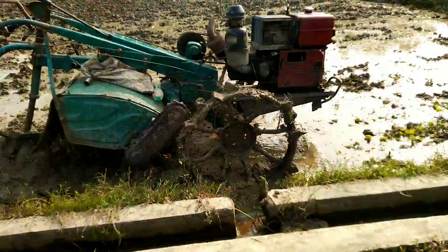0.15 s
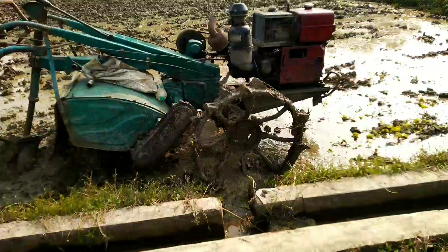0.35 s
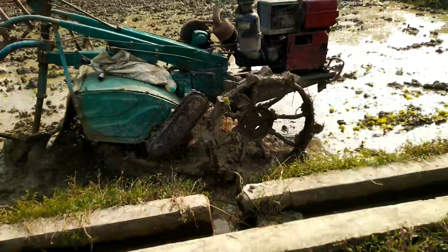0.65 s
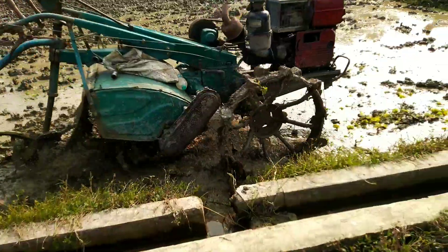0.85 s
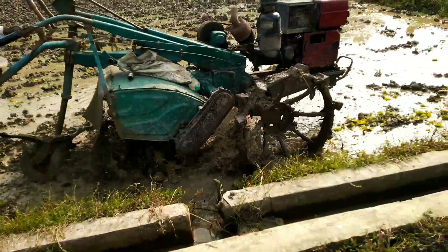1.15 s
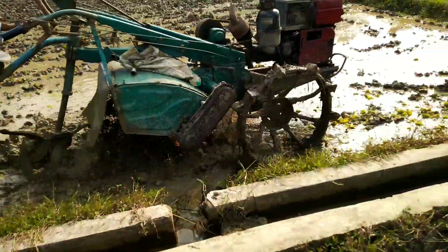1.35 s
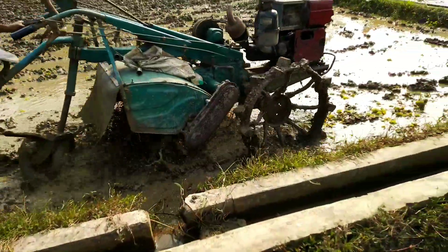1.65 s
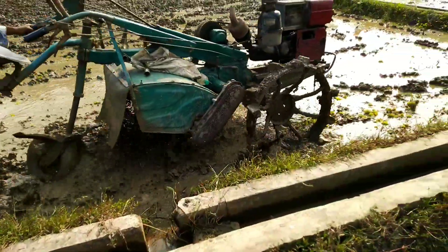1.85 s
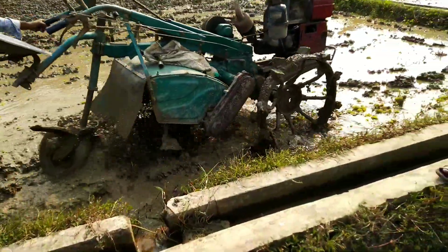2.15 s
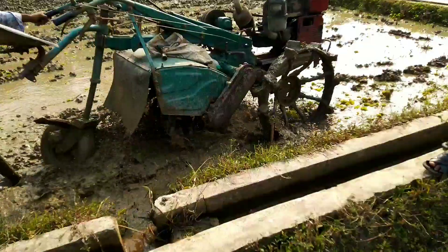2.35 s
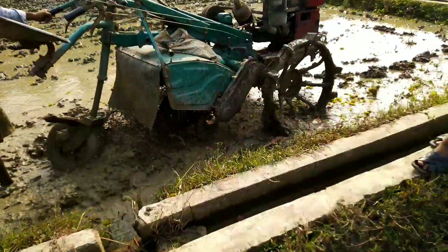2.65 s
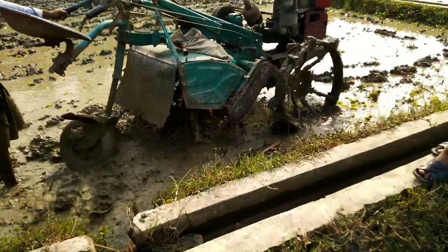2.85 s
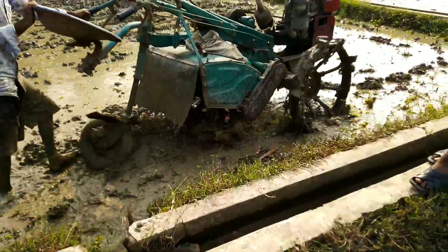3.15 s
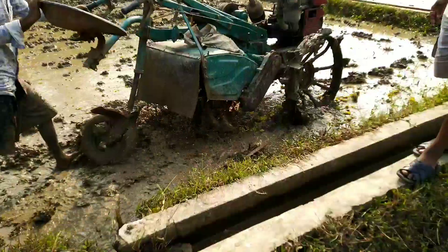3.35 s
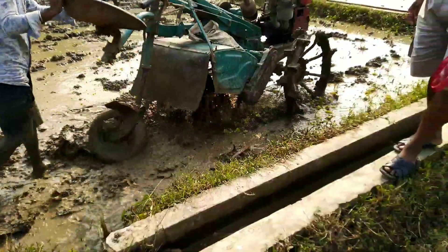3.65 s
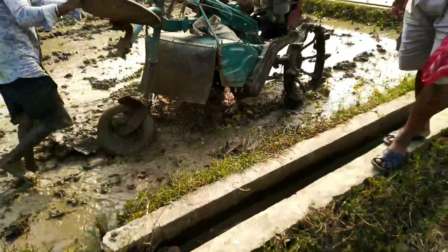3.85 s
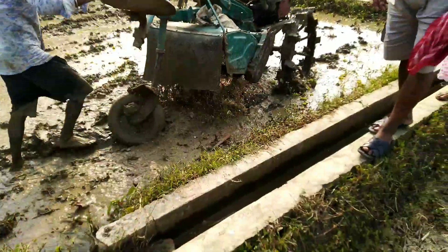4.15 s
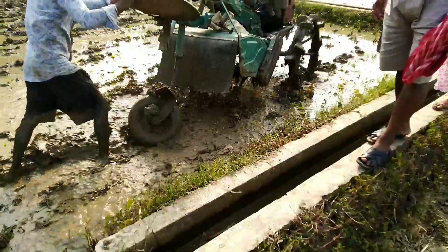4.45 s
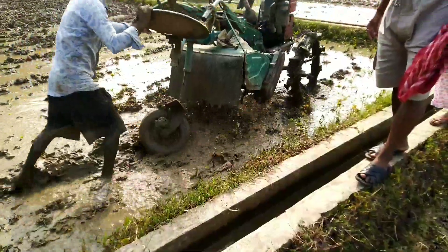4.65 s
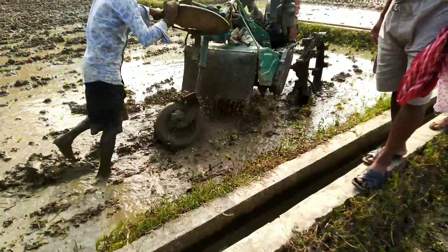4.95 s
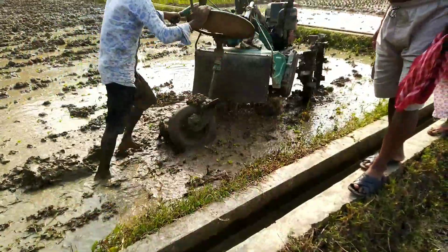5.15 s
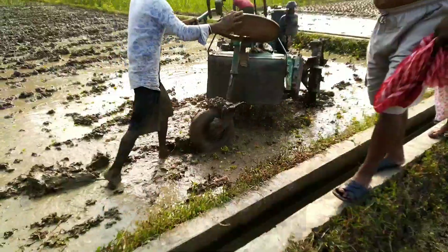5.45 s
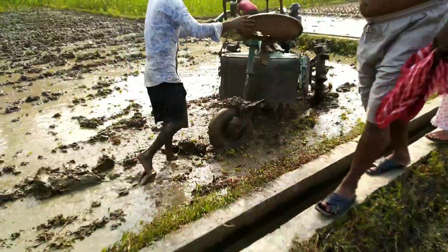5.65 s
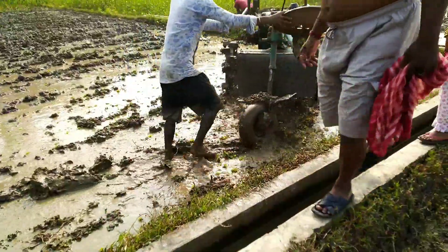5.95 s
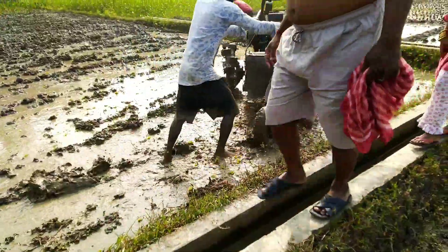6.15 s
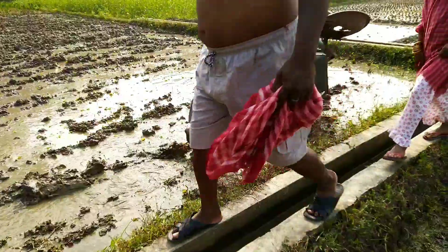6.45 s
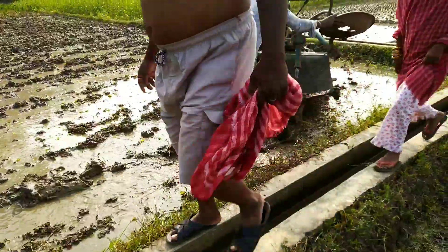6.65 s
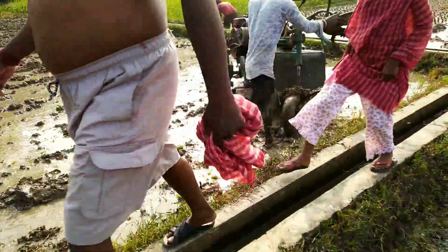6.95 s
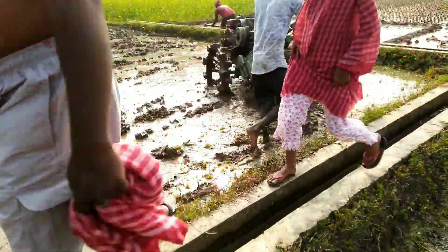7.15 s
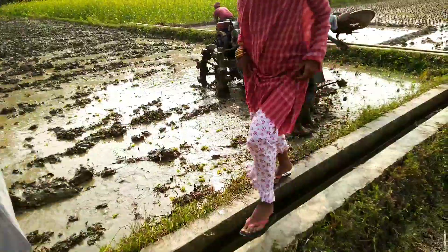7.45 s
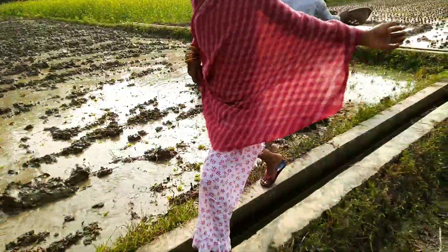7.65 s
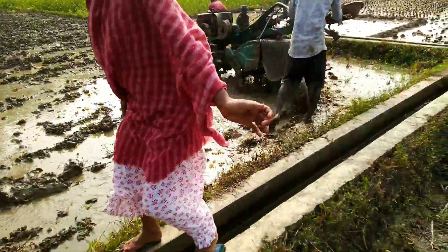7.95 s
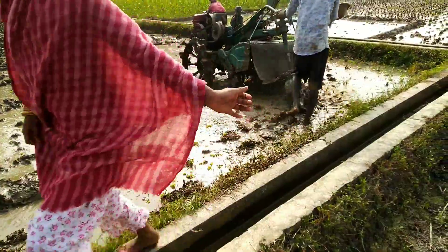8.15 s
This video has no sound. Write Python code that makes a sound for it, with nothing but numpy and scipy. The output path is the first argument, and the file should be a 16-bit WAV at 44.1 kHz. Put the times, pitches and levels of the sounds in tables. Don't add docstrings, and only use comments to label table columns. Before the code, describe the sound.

A continuous diesel chug, about twelve or thirteen firings each second, heard near and dry in the open air. Each cycle has a hollow puff, midrange steel clack, casing rattle and a sputtering jet of air. An abrupt scene change comes almost at once; later the engine faces away, sinks behind walking people and reopens slightly. Phone stereo, thin in deep bass, with low sounds central and treble hiss leaning left.

```python
import sys
import numpy as np
from scipy import signal
from scipy.fft import rfft, irfft, next_fast_len
from scipy.io import wavfile
from scipy.ndimage import uniform_filter1d, minimum_filter1d, map_coordinates

SR = 44100
rng = np.random.default_rng(int(sys.argv[2]) if len(sys.argv) > 2 else 0)


def generate_wav(sig):
    pcm = np.round(np.clip(np.atleast_2d(sig).T, -1, 1) * 32767).astype(np.int16)
    wavfile.write(sys.argv[1], SR, pcm)


def field_ratio(decibels):
    return 10 ** (np.asarray(decibels, dtype=float) / 20)


N = 366471
CUT_S = .375
KNOCK_DB = -16.5

# (time [s], turned away [0-1], extra firing knock [dB])
BEHIND = [(0, 1, 3), (.36, 0.8, -1), (.38, 0.63, 1.5), (3, 0.26, -2), (4.5, 0.38, 1), (5.3, 0.84, -2.5),
          (6.2, 0.98, 0.5), (7, 0.97, 1), (7.5, 1, 2.5), (8.31, 0.98, -2)]
# (time [s], level [dB])
VIEW = [(0, 0), (.39, -0.5), (.6, 1.5), (1.1, 1.5), (2.3, .5), (3.5, -0.5), (4.7, -1), (5.6, -2.5),
        (6.15, -4), (6.4, -6), (6.7, -7), (7.3, -3.5), (7.8, -4.5), (8.31, -1.5)]
# (frequency [Hz], level [dB])
KNOCK = [(1000, 16), (1400, 21.5), (1800, 30.5), (2150, 30), (2400, 34.5), (2700, 25.5), (3100, 22),
         (4000, 12.5), (5500, 6), (6500, -6.5), (7300, -34), (8500, -52)]


def unit(x):
    return x / np.sqrt(np.mean(x ** 2) + 1e-20)


def along(points, hz):
    f, v = np.transpose(points)
    return np.interp(np.log(hz + 1), np.log(f + 1), v)


def curves(rows):
    s, *cols = np.transpose(rows)
    return [np.interp(np.arange(N) / SR, s, c) for c in cols]


def filtered(x, response):
    m = next_fast_len(N + 8192)
    return irfft(rfft(x, m) * response(np.fft.rfftfreq(m, 1 / SR)), m)[..., :N]


def coloured(x, points):
    return filtered(x, lambda hz: field_ratio(along(points, hz)))


def left_right(db):
    return field_ratio(np.array([db / 2, -db / 2]))


def earlier(first, then):
    return np.where(np.arange(N) < CUT_S * SR, first, then)


def facing(side, back, first):
    return earlier(first, side + (back - side) * curves(BEHIND)[0])


def firings():
    # (time [s], firings so far [count])
    turns = [(0.0, -0.34), (0.1048, 1.0), (0.3393, 4.0), (0.4284, 5.0), (1.0693, 13.0), (1.4717, 18.0),
             (2.1133, 26.0), (2.4354, 30.0), (3.0726, 38.0), (3.716, 46.0), (4.3616, 54.0), (5.0849, 63.0),
             (5.2415, 65.0), (5.473, 68.0), (6.6968, 84.0), (7.6222, 96.0), (8.32, 105.01)]
    s, count = np.transpose(turns)
    return np.interp(np.arange(np.ceil(count[0]), count[-1]), count, s)


def each_firing(ms, shape, scatter_db, jitter_ms):
    luck = rng.standard_normal((len(firings()), 2))
    at = np.round((firings() + (ms + jitter_ms * luck[:, 0]) / 1000) * SR).astype(int)
    marks = np.zeros(N + SR)
    marks[at.clip(0)] = field_ratio(scatter_db * luck[:, 1])
    return signal.fftconvolve(marks[:N], shape)[:N]


def detour_ms():
    s, away, _ = np.transpose(BEHIND)
    return 2.4 * np.interp(firings(), s, away) ** 2


def patchy_noise(patchy_db):
    z = signal.stft(rng.standard_normal((2, N)), nperseg=256)[2]
    field = uniform_filter1d(rng.standard_normal(z.shape[1:]), size=4, axis=0)
    field = uniform_filter1d(field, size=4, axis=1)
    return signal.istft(z * field_ratio(patchy_db * unit(field)), nperseg=256)[1][:, :N]


def exhaust():
    # (time from the main puff [ms], ring [Hz], decay [ms],
    # size from the side [gain], size from behind [gain])
    puffs = [(-8.7, 150, 1.33, 1.12, 1.54), (-8.9, 101, 6.8, -.38, -.54), (1, 70, 19, -.09, -.09),
             (13.2, 300, 3, .11, .12), (14.9, 184, 2.8, -.08, -.45), (19.6, 190, 2.9, -.08, .11),
             (35.5, 173, 5, -.09, -.12), (36.7, 227, 26, -.075, -.06), (-23, 760, 8, .09, .04),
             (17.6, 370, 9, .05, 0), (-28.5, 390, 7, .13, .02), (-25.3, 325, 9, 0, .1)]
    # (frequency [Hz], level [dB])
    pipe = [(50, 3.5), (80, -0.5), (170, 0.5), (230, 5), (300, 3), (420, 6.5), (470, 4), (530, -3),
            (620, 2), (760, 6.5), (1200, -30)]
    # (frequency [Hz], level [dB])
    pipe_first = [(50, -1), (100, 2), (150, -0.5), (200, -7), (300, -3), (420, 0), (760, 9), (1200, 1)]
    # (time [s], extra below the pipe note [dB], puff level [dB])
    load = [(0, 1.5, 1.5), (.36, 1, -1), (1.1, 0.7, 0.7), (1.8, 1.5, -0.5), (2.1, 0, 2.5), (2.7, 3.5, -1),
            (3.5, 1.5, 0.4), (4.2, 2.5, -0.3), (5.3, 6, -4.5), (6.4, 2.1, 0.9), (7.7, 1, 1.9),
            (8.31, 2.5, -1)]
    ms_axis = np.arange(SR // 8) / SR * 1000
    deep_db, load_db = curves(load)
    swell = each_firing(-33, np.ones(SR // 12), scatter_db=.8, jitter_ms=0).clip(.5, 1.6)
    gas = np.zeros(N)
    for ms, hz, decay, side, back in puffs:
        fade = np.exp(-ms_axis / decay) * (1 - np.exp(-ms_axis / .7))
        ring = np.sin(2 * np.pi * hz * ms_axis / 1000) * fade
        size = side + (back - side) * curves(BEHIND)[0]
        gas += size * each_firing(ms, ring, scatter_db=.1, jitter_ms=.046)
    gas = earlier(coloured(gas * swell, pipe_first), coloured(gas * swell, pipe))
    deep = (field_ratio(deep_db) - 1) * coloured(gas, [(150, 5.5), (200, -23)])
    slow = np.sqrt(np.abs(uniform_filter1d(gas ** 2, size=SR // 4)))
    return field_ratio(-25.5 + facing(0, 2.5, 2.5) + load_db) * (gas + deep) / slow


def beats():
    # (time from the main puff [ms], decay [ms],
    # casing [dB], knock [dB], hiss [dB])
    blows = [
        (-25.5, 7, 2.5, 6.5, 1.5),
        (-6.5, 4, -9.5, 3.5, -9),
        (13, 6, 1, -1.5, 7),
        (27.5, 5, 0, 1, -6),
        (37.5, 4, 2.5, 0, 3.5),
    ]
    ms_axis = np.arange(SR // 10) / SR * 1000
    power = np.ones((3, N))
    for k, (ms, decay, *dbs) in enumerate(blows):
        extra = 1
        if k == 0:
            ms = ms + detour_ms()
            extra = field_ratio(curves(BEHIND)[1])
        shape = np.exp(-ms_axis / decay) * (1 - np.exp(-ms_axis / .6))
        blow = each_firing(ms, shape, scatter_db=1.2, jitter_ms=.4)
        power += field_ratio(dbs)[:, None] ** 2 * np.abs(blow) * extra
    return np.sqrt(power / uniform_filter1d(power, size=SR // 3, axis=1))


def steel_knock(beat):
    # (frequency [Hz], level [dB])
    knock_behind = [(1400, 1.5), (1700, -5), (2300, 2), (3000, 0.5), (3800, -1.5), (5000, 0), (6000, -2.5)]
    # (frequency [Hz], level [dB])
    knock_first = [(1500, -4.5), (2400, 0.5), (3000, 2.5), (4000, 4), (5000, 1), (6500, -4.5)]
    steel = unit(coloured(patchy_noise(patchy_db=1.2) * beat, KNOCK))
    knock = facing(steel, coloured(steel, knock_behind), coloured(steel, knock_first))
    return field_ratio(KNOCK_DB + curves(VIEW)[0]) * knock


def hard_knocks():
    # (time [s], peak between the ports [dB])
    hard = [(0.3157, -8), (0.4838, -9), (0.6444, 2), (0.8046, -1), (0.8854, 2), (1.6861, -9), (1.7669, -1),
            (2.4838, -7), (2.6958, -11), (2.8878, -11), (3.7614, -7), (3.8541, -8.5), (4.1593, -4),
            (4.2592, -9), (4.6455, -9), (5.2185, -13), (5.2964, -12.5), (5.451, -7), (5.8346, -3),
            (7.4465, -7), (7.6006, -12), (7.6779, -10), (7.7553, -7.5), (7.9099, -10), (8.1414, -9),
            (8.2192, -15), (8.2974, -2)]
    u, marks = np.arange(SR // 20) / SR, np.zeros(N)
    s, db = np.transpose(hard)
    marks[np.round(s * SR).astype(int)] = field_ratio(db + 5.5)
    fade = np.exp(-u / .004) * (1 - np.exp(-u / .0004))
    ring = signal.fftconvolve(marks, fade * np.sin(2 * np.pi * 2340 * u))[:N]
    puff = signal.fftconvolve(marks, fade)[:N] * rng.standard_normal(N)
    return ring + field_ratio(-35) * coloured(puff, KNOCK)


def ticks():
    u = np.arange(SR // 20) / SR
    shape = np.exp(-u / .005) * (1 - np.exp(-u / .0007))
    env = each_firing(-25 + detour_ms(), shape, scatter_db=2, jitter_ms=.4)
    bright = [(1200, -20), (1900, 2), (2400, 0), (2900, 8), (3800, 6), (4500, -5), (6500, -30)]
    tick = coloured(env * rng.standard_normal((2, N)), bright)
    stands_out_db = 1.8 * curves(BEHIND)[1]
    return tick * field_ratio(KNOCK_DB - 16 + curves(VIEW)[0] + stands_out_db)


def casing_drone(beat):
    # (frequency [Hz], level per Hz [dB])
    casing_first = [(30, 3), (80, 27.5), (200, 24.5), (330, 24), (450, 20.5), (700, 24.5), (950, 17.5),
                    (1400, 24), (1800, -12.5)]
    # (frequency [Hz], level per Hz [dB])
    casing_side = [(30, 5), (90, 39), (200, 34), (300, 39.5), (460, 40), (530, 7), (610, 34.6), (750, 46),
                   (1000, 44.5), (1300, 22.5), (1600, 3.3)]
    # (frequency [Hz], level per Hz [dB])
    casing_behind = [(30, 6), (90, 38), (200, 42), (430, 42.5), (540, 18), (650, 40.6), (800, 43.5),
                     (1000, 42), (1300, 35), (1600, 2.7)]
    rattle = patchy_noise(patchy_db=1) * beat
    views = [unit(coloured(rattle, c)) for c in (casing_side, casing_behind, casing_first)]
    view_db = .35 * curves(VIEW)[0]
    return field_ratio(-22.5 + view_db + facing(0, -2.67, -1.2)) * facing(*views)


def hiss_level():
    level_db = -51 + 1.64 * curves(VIEW)[0] + facing(0, 0, -9)
    return field_ratio(level_db) * left_right(facing(12, 14.5, -10.5))


def spits():
    jets = uniform_filter1d(rng.exponential(size=N) ** 6, size=60)
    return np.sqrt(1 + .25 * jets / jets.mean())


def air_hiss(beat):
    # (frequency [Hz], level per Hz [dB])
    hiss_colour = [(5500, -30), (6800, 0), (8300, -23), (9300, -6), (10000, 3), (13000, -0.5),
                   (15500, -10.5)]
    # (frequency [Hz], level [dB])
    hiss_tilt = [(7000, -3), (8500, -9), (10000, -6), (12500, 0), (14000, 7), (15500, 18)]
    hiss = coloured(patchy_noise(patchy_db=1.5) * beat * spits(), hiss_colour)
    hiss = filtered(hiss, lambda hz: left_right(along(hiss_tilt, hz)))
    return unit(hiss) * hiss_level()


def spurts():
    u = np.arange(SR // 20) / SR
    env = each_firing(13.8, np.exp(-u / .004), scatter_db=5.5, jitter_ms=.7)
    bright = [(5000, -40), (8000, -1), (10000, -1), (15500, -9)]
    jets = coloured(env * rng.standard_normal((2, N)), bright)
    return jets * hiss_level() * field_ratio(4 + facing(0, -9, -9))


def gush(rate):
    knots = rng.standard_normal(int(N * rate / SR) + 4)
    return field_ratio(1.3 * map_coordinates(knots, [np.arange(N) * rate / SR]))


def mud():
    # (time [s], level [dB], length [s])
    splash = [
        (2.476, -25, 0.016),
        (6.862, -29, 0.049),
        (8.124, -26, 0.036),
    ]
    t, env = np.arange(N) / SR, np.zeros(N)
    for s, db, length in splash:
        u = np.clip(t - s, 0, None) / length
        env += field_ratio(db) * u * np.exp(1 - 2.24 * u)
    grains = rng.standard_normal((2, N)) * rng.exponential(size=N)
    return env * unit(coloured(grains, [(1500, -30), (3500, 8), (6000, -7), (8000, -20), (15000, -16)]))


def ports(same, pair):
    # (frequency [Hz], level [dB])
    left_port = [(60, -1.25), (400, -2), (770, -4), (1270, -8.5), (1650, -9), (1900, -10), (2400, -13.5),
                 (3000, -4.5), (4000, 1.5), (5200, -13), (6200, -5.5), (7000, -6.5)]
    # (frequency [Hz], phase [radians])
    lead = [(1200, 0), (2070, 1.4), (3500, 3), (5000, 1)]
    # (frequency [Hz], correlation [0-1])
    likeness = [(400, .995), (1000, .96), (1500, .72), (2000, .48), (3000, .58), (4000, .35), (6000, .2)]

    def gain(hz):
        return field_ratio(along(left_port, hz)) * np.exp(1j * along(lead, hz))

    def alike(hz):
        return along(likeness, hz)

    left = filtered(same, gain)
    left += filtered(pair[0], lambda hz: gain(hz) * alike(hz))
    left += filtered(pair[1], lambda hz: gain(hz) * np.sqrt(1 - alike(hz) ** 2))
    return np.array([left, same + pair[0]])


def scene():
    drone_beat, knock_beat, hiss_beat = beats()
    body = casing_drone(drone_beat) + steel_knock(knock_beat) + ticks()
    engine = ports(exhaust() + hard_knocks(), body)
    air = (air_hiss(hiss_beat) + spurts()) * gush(rate=9)
    return engine + air + mud()


def limited(x, top):
    need = np.minimum(1, top / (np.abs(x).max(axis=0) + 1e-9))
    return x * uniform_filter1d(minimum_filter1d(need, size=260), size=130)


def roll_off(x):
    return signal.sosfilt(signal.butter(12, 15740, fs=SR, output="sos"), x)


def record(dry):
    x = filtered(dry, lambda hz: (hz < 15550) / np.sqrt(1 + (45 / (hz + 1)) ** 6))
    return roll_off(limited(x, top=.85))


dry = scene()
out = record(dry)
generate_wav(out)
```